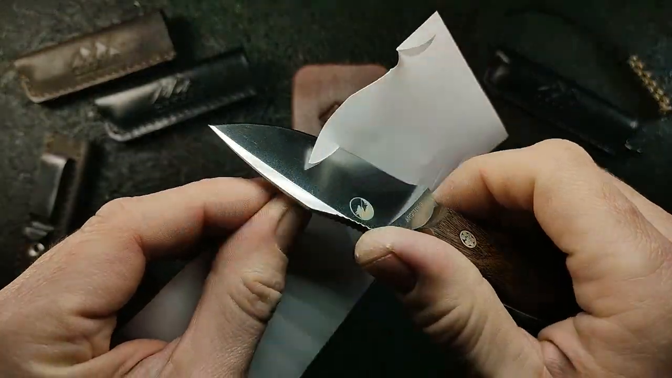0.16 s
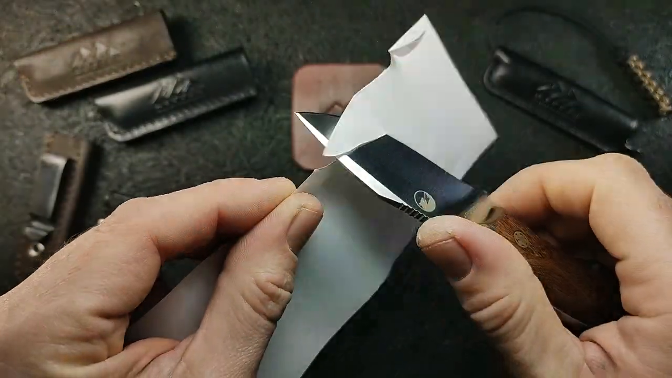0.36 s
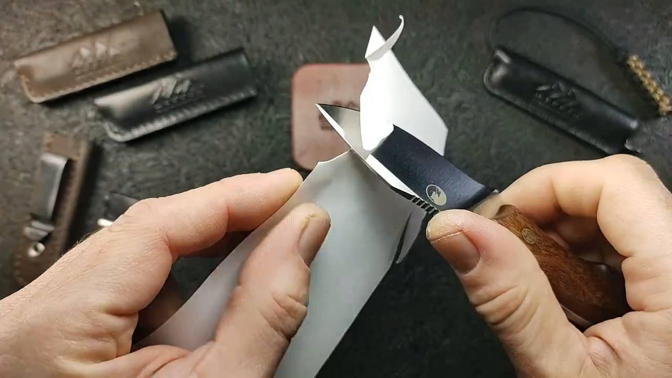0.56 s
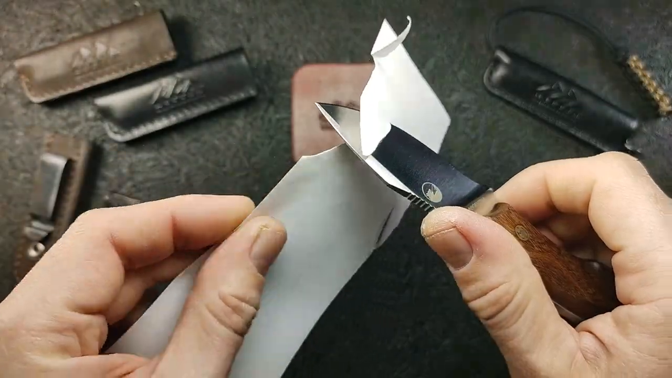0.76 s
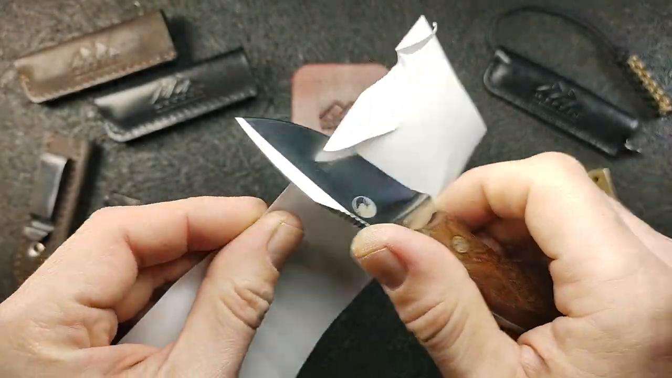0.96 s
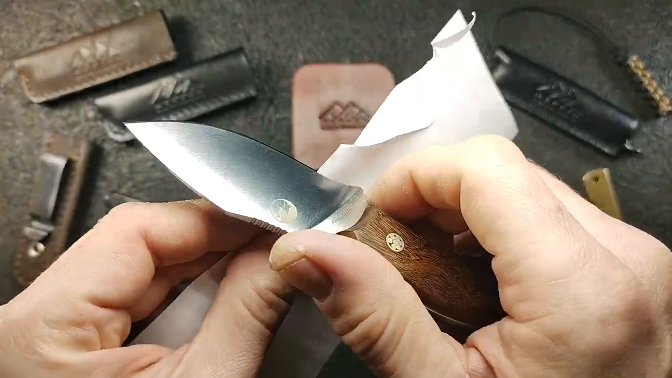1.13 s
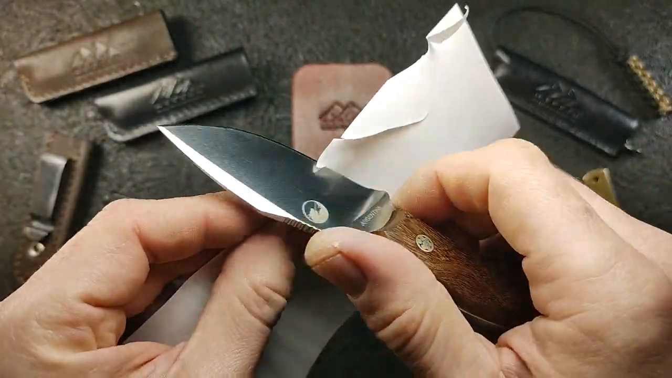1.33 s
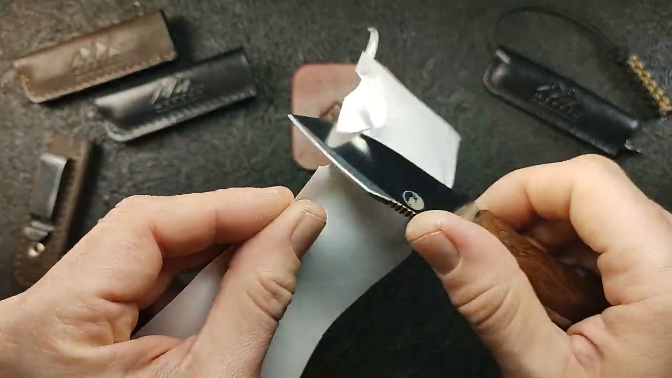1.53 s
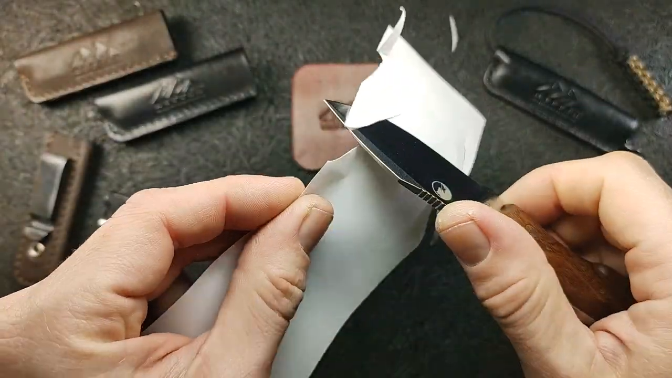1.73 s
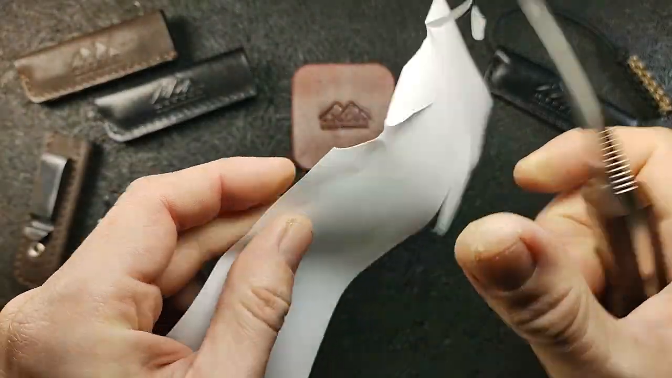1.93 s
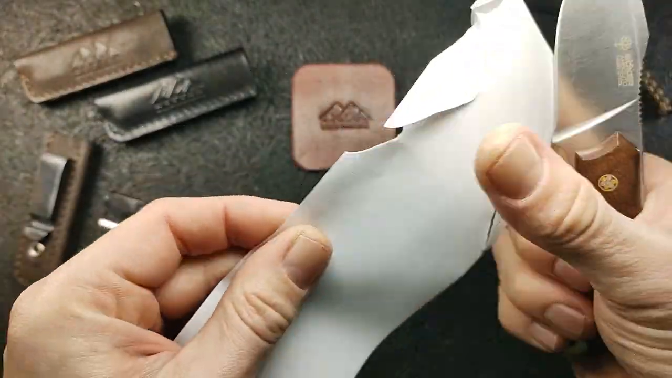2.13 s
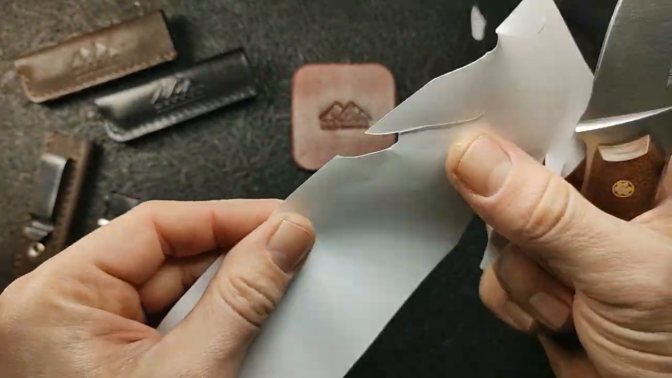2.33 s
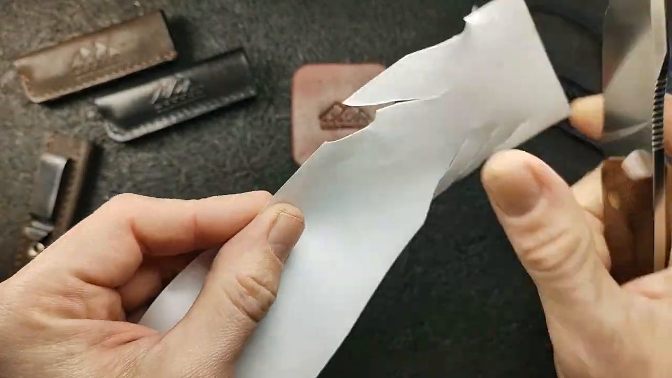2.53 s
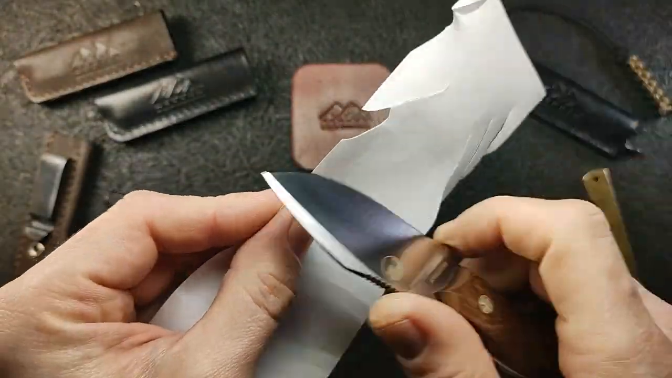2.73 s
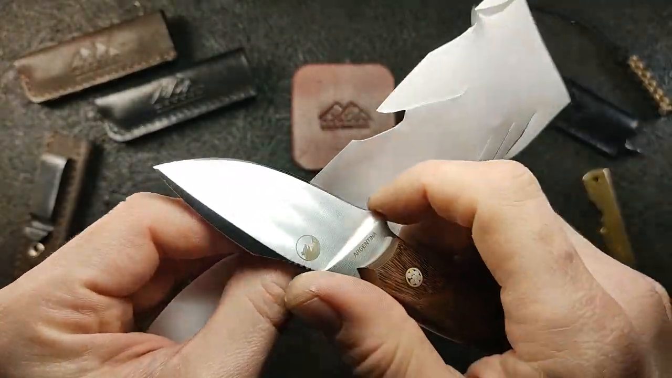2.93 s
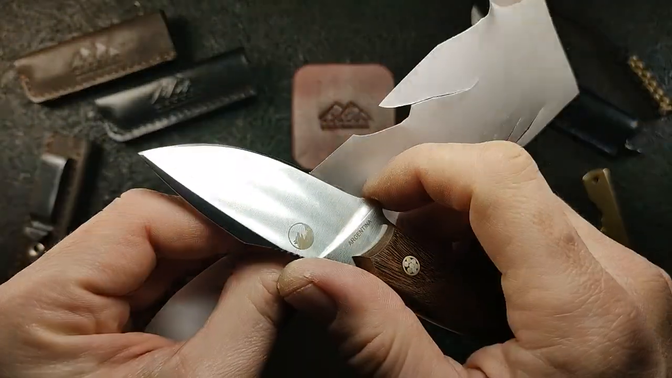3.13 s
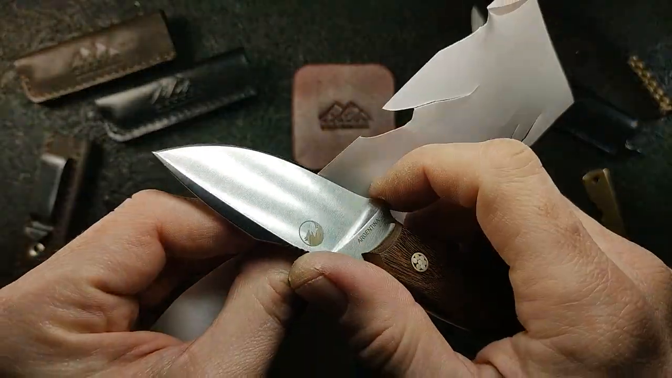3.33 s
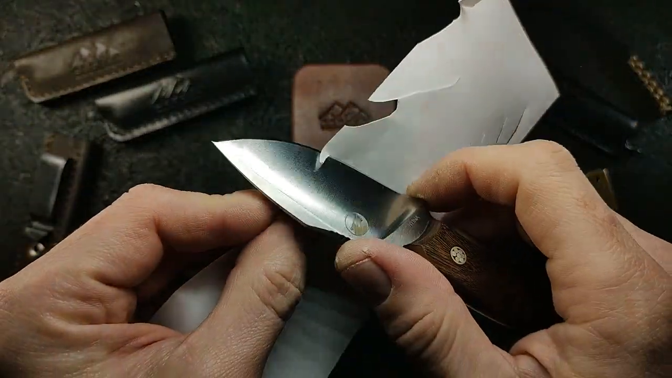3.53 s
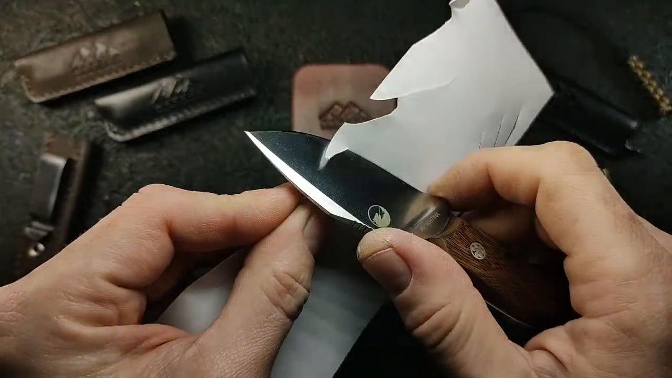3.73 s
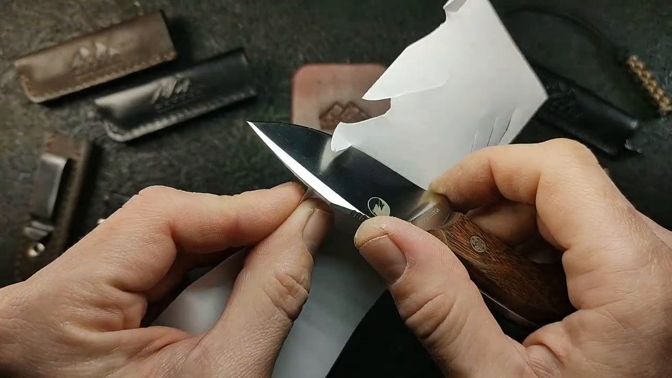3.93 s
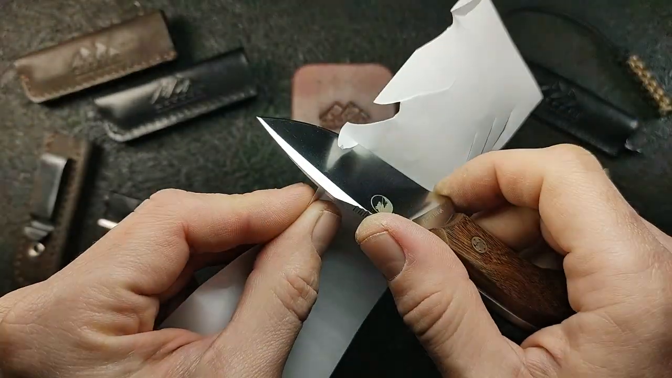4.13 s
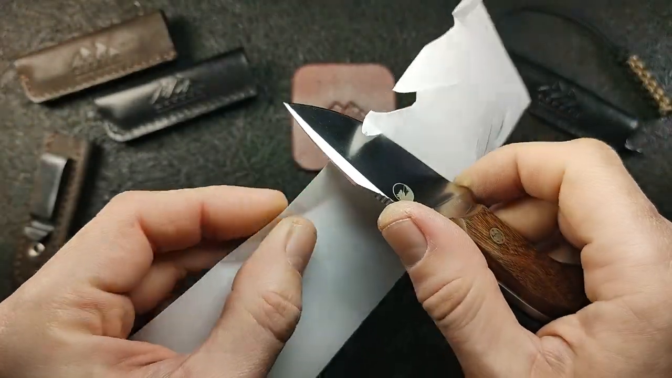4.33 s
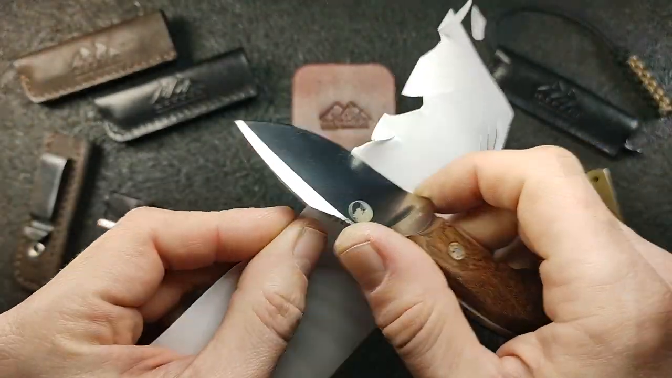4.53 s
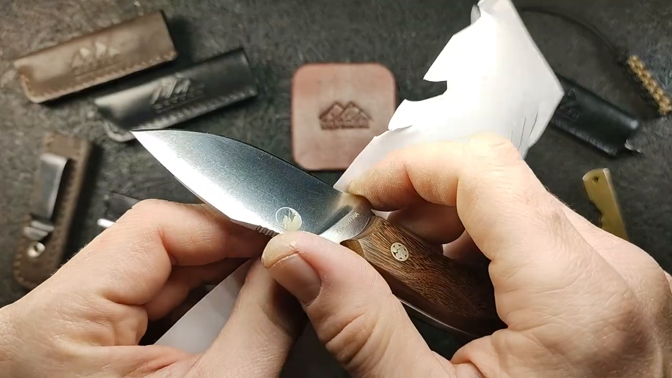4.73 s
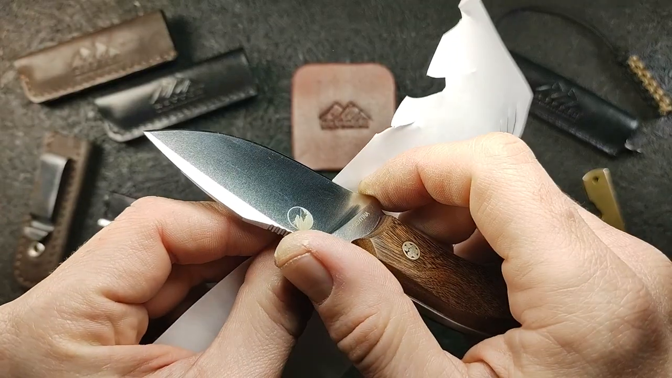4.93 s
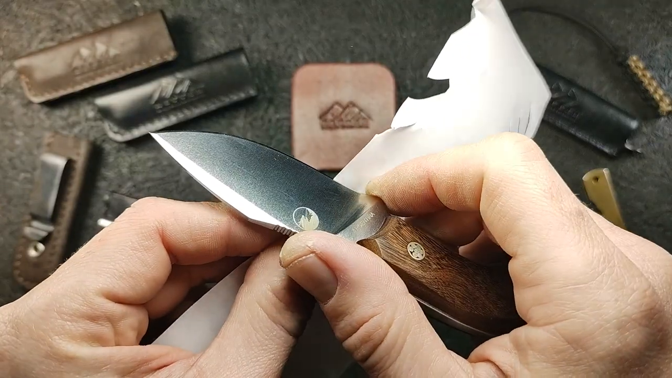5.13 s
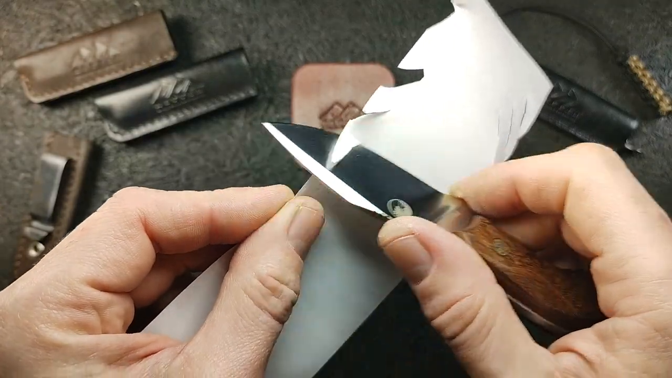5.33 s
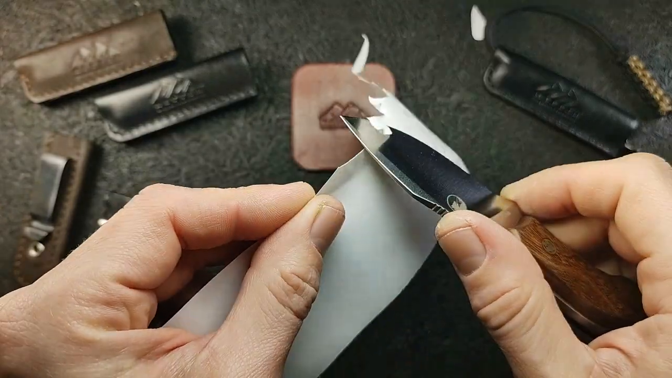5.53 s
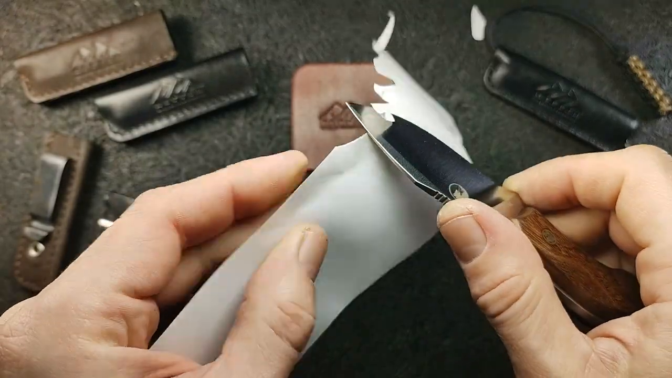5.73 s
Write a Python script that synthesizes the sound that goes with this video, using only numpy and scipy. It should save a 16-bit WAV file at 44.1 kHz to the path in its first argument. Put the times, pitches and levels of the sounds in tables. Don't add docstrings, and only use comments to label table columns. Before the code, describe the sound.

A sharp blade slices a hand-held sheet of paper in several quick crisp rips, with papery rustles and small pops between, in a quiet room.

```python
import sys
import numpy as np
from scipy import signal
from scipy.fft import rfft, irfft, next_fast_len
from scipy.io import wavfile
from scipy.ndimage import uniform_filter1d, map_coordinates

SR = 44100
rng = np.random.default_rng(int(sys.argv[2]) if len(sys.argv) > 2 else 0)


def store_wav(level_fs):
    pcm = np.round(np.clip(np.atleast_2d(level_fs), -1, 1) * 32767)
    wavfile.write(sys.argv[1], SR, pcm.T.astype(np.int16))


def gain_from_db(level_db):
    decades = np.asarray(level_db, float) / 20
    return 10 ** decades


N = 254898

# frequency in Hz, density in dB per Hz.
RUMBLE_SPECTRUM = [(15, -40), (30, -46), (45, -8), (62, -6.5), (75, -5.5), (87, 0.5), (100, -10),
                   (125, -15), (200, -26), (300, -45), (450, -62)]
# time in seconds, rumble level in dB.
MACHINE_LOAD = [(0.0, -72), (0.27, -68), (0.45, -61.5), (1.29, -69.5), (3.81, -66), (4.01, -67.5),
                (5.49, -62), (5.78, -65.5)]
# peak in seconds, level in dB, rise and fall in seconds for 20 dB.
LINE_SWELLS = [
    (.38, -66.5, 0.14, 0.21),
    (.66, -70, 0.11, 0.37),
    (1.11, -76, 0.33, 0.22),
    (1.69, -57.5, 0.27, 0.21),
    (2.05, -68, 0.23, 0.43),
    (2.46, -61, 0.063, 0.14),
    (3.64, -68, 0.14, 0.3646),
    (4.06, -81, 0.73, 0.1514),
    (5.131, -70.5, 0.57, 0.2656),
    (5.599, -66.5, 0.2802, 0.15),
]
# frequency in Hz, density in dB per Hz.
HISS_SPECTRUM = [(150, 8.5), (300, 1), (600, 0), (1200, -7.5), (2500, -6.5), (5000, -15.5), (9000, -17.5),
                 (16000, -22)]
# centre in Hz, width in Hz, gain in dB.
DESK_MODES = [(462, 76, 10.5), (858, 200, 7.5), (1000, 75, -10), (1360, 180, 4.5), (1575, 140, -9),
              (1695, 200, 7), (1983, 43, -16), (2600, 410, 4.5), (3150, 930, -7), (4100, 4100, 18.5),
              (4414.2, 100, -11.5), (5240, 250, 1), (6900, 2800, 10), (9250, 2300, -4)]
# delay in ms, share of the direct sound as a signed ratio.
QUICK_ECHOES = [(0.382, 0.41), (0.515, 0.2), (.76, 0.93), (0.963, -0.41), (1.301, 0.057), (1.585, 0.45),
                (2.019, -0.53), (2.8, 0.045)]
# time in seconds, peak in dB, bright edge in dB re peak.
PAPER_TICKS = [(0.093, -67, 12.5), (.117, -72, 17), (.479, -43, 17), (1.457, -49, 1), (2.421, -34.5, 0),
               (2.475, -35, -7.5), (2.494, -24, -11), (3.229, -52, -12), (4.41, -57, 12), (4.45, -43.5, 5),
               (4.583, -51, 5), (1.991, -51.5, 13.5), (2.25, -48, 10.5), (0.214, -52.5, 9),
               (0.151, -56, 7.5), (0.203, -50, 4), (.7, -54, 7), (2.122, -54, 16.5), (2.363, -45.5, 13),
               (2.411, -38, 1.5), (2.621, -38.5, 2), (2.742, -42, 6.5), (2.769, -50, 12), (2.795, -62, 17),
               (2.828, -48, 3.5), (3.047, -45, 2), (2.33, -39, 6), (2.681, -30.5, -6), (2.703, -38.5, 8),
               (3.258, -52.5, 9), (3.335, -48.5, -18), (4.091, -43, 4.5), (4.267, -50, 4), (4.273, -43, 7),
               (4.285, -33.5, 4), (4.293, -44.5, 10.5), (4.12, -37, -5), (4.128, -34, -6),
               (4.11, -40.5, -0.5), (4.138, -34, -1.5), (4.184, -47.5, 10), (4.685, -34.5, -1),
               (4.763, -44, 3)]
# time in seconds, peak in dB, bright edge in dB re peak,
# thump in dB re peak, thump frequency in Hz.
BUCKLE_POPS = [(0.7344, -38, -34, -2.5, 553), (0.773, -33.5, -29, -2.5, 470), (1.067, -53.5, -4, 2.5, 465),
               (0.601, -40, -17, 0, 500), (1.702, -29.5, -11, 3, 650), (1.722, -35.5, 2, -0.5, 430),
               (1.749, -35.5, 10.5, -1, 750), (2.432, -59, -18, 2, 260), (2.451, -53, -15, -7, 443),
               (2.014, -46.5, -28, -17, 300), (2.022, -36.5, -28, -15, 430), (1.596, -30, -25.5, -10, 700),
               (2.318, -40.5, -20, -31, 450), (2.336, -33, -7, -13.5, 430), (2.447, -39, -13.5, -2, 500),
               (2.466, -49, 14, 6, 597.6), (2.456, -23.5, -19, -30, 581), (2.486, -18, -23, -23, 163),
               (2.676, -31, -5, -6.5, 375), (4.16, -26, -25, -26, 497), (4.628, -61, -14, 6.5, 362),
               (4.697, -36, -9, -14.5, 470.2)]
# start in seconds, length in seconds, start and end level in dB, tautness 0-1.
FINGER_SLIDES = [(0.106, 0.099, -75, -74, 0.6), (0.755, 0.08, -77, -60, 0.96),
                 (0.874, 0.053, -70, -64.5, 0.65), (0.944, 0.067, -59, -62, 0.68),
                 (1.02, 0.13, -66, -70.5, 0.52), (1.179, 0.03, -53, -54, 0.54),
                 (1.261, 0.12, -67, -66.5, 0.2), (1.765, 0.3, -59.5, -99, 0.68),
                 (1.985, 0.12, -66, -59.5, 0.72), (2.135, 0.096, -65, -72, 0.5),
                 (2.214, 0.12, -64, -62, 0.92), (2.411, 0.088, -83, -48, 0.96),
                 (2.522, 0.073, -69, -68.5, 0.37), (2.631, 0.02402, -63.5, -64, 0.5),
                 (2.737, 0.16, -59.5, -92, 0.43), (3.075, 0.14, -74, -67, 0.2),
                 (3.264, 0.089, -66.5, -76.5, 0.1), (3.415, 0.026, -72.5, -73.5, 0.03),
                 (3.533, 0.015, -82, -70, 0.46), (3.941, 0.076, -73, -76, 0.44),
                 (4.395, 0.21, -60.5, -59.5, 0.76), (4.778, 0.061, -63.5, -61.5, 0.7),
                 (4.871, 0.036, -61, -73.5, 0.64), (4.933, 0.13, -75, -67.5, 0.38)]
# peak in seconds, level in dB, rise and fall in seconds for 20 dB, tautness 0-1.
SHEET_TUGS = [(0.813, -61, 0.24, 0.24, 0.64), (1.172, -61.5, 0.069, 0.026, 0.29),
              (1.25, -46, 0.039, 0.1, 0.91), (2.13, -51.5, 0.013, 0.016, 1),
              (2.341, -56, 0.057, 0.14, 0.79), (2.487, -43.5, 0.0034, 0.037, 0.27),
              (2.679, -33.5, 0.014, 0.01, 0.4548), (2.923, -59, 0.052, 0.049, 0.83),
              (4.184, -56, 0.0054, 0.036, 0.66), (4.288, -59, .045, .03, .8),
              (4.699, -56, 0.014, 0.02, 0.18), (4.77, -57.5, 0.071, 0.022, 0.52),
              (1.98, -61.5, 0.033, 0.15, 0.86), (3.064, -58, 0.024, 0.081, 0.91),
              (2.452, -50, 0.0046, 0.083, 0.7), (2.658, -42.5, 0.0058, 0.056, 1),
              (2.702, -47, 0.054, 0.024, .4), (4.64, -70, 0.047, 0.1, 0.56),
              (5.02, -65, 0.092, 0.063, 0.74), (5.72, -71.5, 0.064, 0.26, 0.58)]
# time in seconds, force in dB, slack of the flap 0-1, tautness of the edge 0-1.
EARLY_CUTS = [
    [(.204, -60, 0.42, 0.56), (.324, -44.5, 0.27, 0.69), (.372, -45, 0.34, 1), (.434, -43, 0.46, 1),
     (.45, -50, 0.5, 0.8), (.474, -60, 0.55, 1)],
    [(.478, -38.5, 0.12, 1), (.532, -36, 0.17, 0.45), (.57, -32.5, 0.09, 0.4), (.605, -32, 0.25, 0.34),
     (.635, -38.5, 0.65, 0.54), (.68, -52, 0.81, 0.56), (.69, -64, 0.54, 0.04), (.72, -72.5, 0.5, 0)],
    [(1.44, -83.5, 1, 0.8), (1.466, -63, 0.42, 0.55), (1.57, -45, 0.52, 1), (1.648, -33, 0.18, 0.62),
     (1.674, -32.5, 0.19, 0.86), (1.69, -47, 0.8, 0.13)],
    [(1.7, -41.5, 0.48, 0.6), (1.714, -37, 0.5, 0.8), (1.754, -44.5, 0.45, 1), (1.78, -79.5, 0.1, 0.4)],
]
# time in seconds, force in dB, slack of the flap 0-1, tautness of the edge 0-1.
LATE_CUTS = [
    [(3.53, -76, 0.06, 0.1), (3.575, -66.5, 0.01, 0.16), (3.61, -46, 0.36, 0.4), (3.65, -43.5, 0.27, 0.34),
     (3.725, -44, 0.45, 0.47), (3.762, -49.5, 0.63, 0.66), (3.775, -51.5, 0.6, 0), (3.79, -53, 0.73, 0.46)],
    [(3.8, -44.5, 0.6, 0.6), (3.82, -47.5, 0.68, 0.53), (3.85, -47, 0.62, 0.76), (3.874, -47, 0.68, 0.86),
     (3.908, -45.5, 0.56, 0.88), (3.926, -106, 1, 0.2)],
    [(4.09, -67, 0.33, 0.54), (4.104, -62, 0.77, 0.52), (4.11, -43, 0.44, 0.8), (4.115, -49, .4, .8),
     (4.12, -42.5, 0.35, 0.78), (4.132, -48.5, .45, 0.7), (4.141, -44, 0.46, 0.93), (4.15, -52, 0.57, 0.66),
     (4.17, -77.5, 0.9, 0.7)],
    [(5.29, -77.5, 0.4, 0.31), (5.37, -65.5, 0.69, 0.83), (5.44, -46, 0.45, 0.64), (5.478, -38, 0.21, 0.69),
     (5.525, -36.5, 0.19, 0.76), (5.54, -41, 0.38, 0.9), (5.57, -31.5, 0, 0.8), (5.59, -36, 0, 0.63),
     (5.618, -36.5, 0.22, 0.5), (5.648, -42, 0.58, 0.73), (5.692, -66, 0.57, 0.4)],
]
# frequency in Hz, density in dB per Hz.
PAPER_SPECTRUM = [(120, 0.5), (300, -31.5), (900, -9.5), (1500, -6), (3000, 4), (5500, -7), (8500, -4.5),
                  (13000, -3.5), (15800, -3)]
# time in seconds, left-right balance in dB.
SHEET_PLACE = [(0.0, 19.5), (0.24, 3.5), (0.45, -0.5), (1.32, 5), (1.93, -1), (3.2, 5), (3.43, 3.5),
               (5.26, 3), (5.36, 2.5), (5.78, 0)]
BAND_EDGES_HZ = [5400, 9000, 3250, 5400, 250, 600, 600, 980, 980, 1530, 1530, 2030, 2030, 3150, 9000, 16000]
BENDING_OCTAVES = [.35, .8, 1.35]
# time in seconds, favoured pitch in octaves over 1 kHz, upper flap mode in dB re lower.
SHEET_BOW = [
    [(0, 1.3, -6), (.2, 0.61, -10), (.36, 1.425, -2.5), (.46, 1.8, -2), (.54, 0.81, -12), (.6, 1.7, -7),
     (.68, 0.64, -2), (.9, 2.45, -2.5), (1.25, 1.554, -2.5)],
    [(1.45, 0.53, -3), (1.55, 1.6, -2), (1.62, 1.5, 7), (1.68, 1, -5.5), (1.77, 1.5, 3.5), (2, 2, 0.5),
     (2.3, 1.6, -5), (2.5, 2.8, -3), (2.7, 2.2, -1)],
    [(2.95, 2.9, 1), (3.1, 1.7, -15), (3.45, 1.1, -16), (3.62, 1.65, -10), (3.75, 0.87, -11.5),
     (3.9, 2.3, -8), (4.1, 0.544, -0.5), (4.3, 4.3, -4)],
    [(4.5, 2.4, 0), (4.8, 2.1, -0.5), (5.05, 1.5, -2), (5.3, 2.2, 3), (5.45, 1.4, -9.5), (5.55, 3.75, -3),
     (5.6, 2.7, 0), (5.66, 2.5, 1.5), (5.78, 1.817, 0)],
]
# middle in seconds, level in dB re force, length in seconds, pitch in Hz.
MODE_SINGS = [(0.152, 0, .12, 4100), (0.231, -2, .05, 4100), (3.158, -2, 0.08, 1407),
              (3.169, 4, 0.091, 1894), (5.385, 3, 0.059, 4200), (5.524, -5, .04, 5180),
              (5.58, -7, 0.033, 5150), (0.377, -2, .12, 2657), (0.363, -13, .12, 1733),
              (.4, -6, 0.093, 5160), (0.561, -6, 0.076, 6900), (0.591, -4.5, .07, 4680),
              (0.613, -13, 0.0204, 1740), (1.476, -2.5, 0.038, 1410), (1.564, -2.5, 0.089, 1750),
              (1.665, -2, 0.036, 2620), (1.65, -11, 0.07, 5130), (2.458, 11, 0.013, 1670),
              (2.49, 9, 0.014, 1652), (3.062, 0, .03, 2394), (3.276, -1, .04, 2470),
              (3.262, 5, 0.031, 4100), (3.333, 2, 0.036, 2370), (3.345, 9, .04, 4100),
              (3.431, 0, .06, 1760), (3.425, 3, .05, 4100), (3.625, -7, .1, 4140), (3.687, -6.5, .16, 1723),
              (3.718, -2.5, .1, 5289), (3.872, -1.5, 0.14, 1320), (3.87, -7, .1, 2663),
              (4.12, -5, 0.062, 5299), (4.137, 4, .04, 2616), (4.12, -2.5, 0.048, 1685),
              (5.49, -4.5, .1, 3910), (5.514, -5.5, 0.07, 1723), (5.563, -4, .03, 4230),
              (5.569, -4, .035, 3730), (5.619, -1.5, 0.057, 5490), (5.635, -2, 0.036, 2625),
              (5.635, -4.5, 0.062, 1320)]
# centre in Hz, width in Hz, gain in dB.
RIM_MODES = [(1406, 71, 6.5), (1956, 53, 6), (2190, 83, 6), (2453, 230, 12.5), (2520, 170, 5),
             (3780, 149, -23), (5040, 83, -9)]
# peak in seconds, level in dB, rise and fall in seconds for 20 dB.
RIM_CATCHES = [(.38, -37.5, 0.066, 0.073), (3.051, -44.5, 0.0094, .008), (3.059, -39.5, 0.0069, 0.0063),
               (3.071, -43, 0.01, 0.018), (3.15, -61, 0.18, 0.11), (3.21, -55, 0.14, 0.02),
               (3.262, -51.5, 0.01285, 0.017), (3.278, -58, .012, 0.01074), (3.34, -57, 0.024, 0.022),
               (3.434, -72, 0.027, 0.034), (3.71, -40.5, 0.05, 0.087), (3.86, -48, 0.35, 0.031),
               (4.13, -46, 0.038, 0.028)]
# frequency in Hz, reverberation time (60 dB) in seconds.
ROOM_DECAY = [(200, 0.64), (2000, 0.12), (12000, 0.062)]
# frequency in Hz, side level in dB.
STEREO_WIDTH = [(150, 2.5), (350, 2.5), (800, 1.5), (1600, -1), (2800, -1), (5000, 0), (10000, 0.5),
                (15000, 0)]


def unit(x):
    return x / np.sqrt(np.mean(x ** 2) + 1e-20)


def along(points, hz):
    f, v = np.transpose(points)
    return np.interp(np.log(hz + 1), np.log(f + 1), v)


def curves(rows):
    s, *cols = np.transpose(rows)
    return [np.interp(np.arange(N) / SR, s, c) for c in cols]


def wobble(rate, at=None):
    steps = np.arange(0, N + 16, 16) if at is None else at
    knots = rng.standard_normal(int(N * 400 / SR) + 4)
    read = map_coordinates(knots, [steps * min(rate, 399) / SR])
    return np.interp(np.arange(N), steps, read) if at is None else read


def filtered(x, response):
    m = next_fast_len(N + 8192)
    return irfft(rfft(x, m) * response(np.fft.rfftfreq(m, 1 / SR)), m)[..., :N]


def band(lo_hz, hi_hz):
    def warped(hz):
        return np.tan(np.pi * np.clip(hz, 1e-3, SR / 2 - 1) / SR)

    def response(f):
        w, lo, hi = warped(f), warped(lo_hz), warped(hi_hz)
        s = (lo * hi - w * w) / (1j * w * (hi - lo))
        first = s * s + 2 * np.sin(np.pi / 8) * s + 1
        second = s * s + 2 * np.cos(np.pi / 8) * s + 1
        return 1 / (first * second)
    return response


def peak(s, db, rise_s, fall_s):
    return [(s - 3 * rise_s, db - 60), (s, db), (s + 3 * fall_s, db - 60)]


def blend(shapes):
    step_s = 0.001
    t = np.arange(0, N / SR + step_s, step_s)
    read = np.array([[np.interp(t, s, c) for c in cols] for s, *cols in map(np.transpose, shapes)])
    power = gain_from_db(2 * read[:, :1])
    mixed = (power * read).sum(0) / power.sum(0)
    return curves(np.column_stack([t, 10 * np.log10(power.sum(0)[0]), *mixed[1:]]))


def swells(rows):
    return blend([peak(*row) for row in rows])[0]


def hum(force_db):
    shake = np.clip((force_db + 62.5) / 25, 0, 1)
    rumble_db = curves(MACHINE_LOAD)[0] + 4.5 * uniform_filter1d(shake, size=round(0.04 * SR))
    common, apart = filtered(rng.standard_normal((2, N)), lambda f: gain_from_db(along(RUMBLE_SPECTRUM, f)))
    line_hz = 157 + 4 * wobble(4.5)
    line = gain_from_db(swells(LINE_SWELLS) + 2.1 * wobble(3.4)) * np.sin(2 * np.pi * np.cumsum(line_hz) / SR)
    mid = unit(common) * gain_from_db(rumble_db + 1.07 * wobble(1.54)) + line
    side = gain_from_db(rumble_db - 19.0) * unit(apart) + 0.081 * mid
    return np.array([mid + side, mid - side])


def hiss():
    mid, side = unit(filtered(rng.standard_normal((2, N)), lambda f: gain_from_db(along(HISS_SPECTRUM, f))))
    side = filtered(side, lambda f: f / (f + 900))
    return gain_from_db(-71.0) * np.array([mid + side, mid - side])


def resonant(f, depth):
    total = 1
    for c, w, db in DESK_MODES:
        gain = gain_from_db(depth * db / 2)
        total = total * (c * c - f * f + 1j * f * w * gain) / (c * c - f * f + 1j * f * w / gain)
    return total


def nearby(x, modes_db, strength, drift_ms, lead_ms, skew_ms):
    size = 2048
    hz, t, z = signal.stft(x, SR, nperseg=size)
    at = np.minimum((t * SR).astype(int), N - 1)
    late = [ms * (1 + drift_ms * wobble(2.5, at)) for ms, share in QUICK_ECHOES]
    skew = [lead_ms + skew_ms * wobble(3, at) for echo in QUICK_ECHOES]
    fine = rng.standard_normal((3, *z.shape), dtype=np.float32)
    fine = uniform_filter1d(uniform_filter1d(fine, size=3, axis=1), size=7, axis=2)
    shared, *own_modes = modes_db * unit(fine)
    lead = np.float32(lead_ms * (1 + 0.23 * wobble(1.483, at)))
    turn = np.complex64(-2j * np.pi * hz[:, None] / 1000)
    ears = []
    for side, own in zip((-0.5, 0.5), own_modes):
        paths = 0
        for (_, share), ms, gap in zip(QUICK_ECHOES, late, skew):
            paths = paths + share * np.exp(turn * np.float32(ms + side * gap))
        arrival = np.exp(turn * side * lead) + strength * paths
        heard = z * gain_from_db(shared + 1.03 * own) * arrival
        ears.append(signal.istft(heard, SR, nperseg=size)[1][:N])
    return np.array(ears)


def snaps():
    t = np.arange(SR // 10) / SR
    thump, knock, dull, edge = np.zeros((4, N + len(t)))
    ticks = [(*row, -32.5, 152.3, 0.01) for row in PAPER_TICKS]
    pops = [(*row, 0.023) for row in BUCKLE_POPS]
    for s, db, edge_db, thump_db, hz, t60 in ticks + pops:
        rise_s = np.clip(0.001 * gain_from_db(-0.8 * edge_db - max(db + 26, 0)), 2e-4, 0.0012)
        rise = 1 - np.exp(-t / rise_s)
        rattle = rng.standard_normal(len(t)) + 3 * np.exp(-t / 0.00022)
        burst = gain_from_db(db - 60 * t / t60) * rise * rattle
        at = slice(round(s * SR), round(s * SR) + len(t))
        thump_t60 = 0.24 * t60 + (30 / hz) ** 2
        thump[at] += gain_from_db(thump_db + db + 6.5 - 60 * t / thump_t60) * rise * np.sin(2 * np.pi * hz * t)
        click = dull if edge_db < -20 else knock
        click[at] += burst
        edge[at] += gain_from_db(edge_db - 12.0) * burst
    pop = thump[:N] + filtered(edge[:N], band(2900, 16000))
    pop += 1.42 * filtered(knock[:N], lambda f: (1j * f / (420 + 1j * f)) ** 2 / (1 + 1j * f / 2600) ** 3)
    pop += 1.77 * filtered(dull[:N], lambda f: (1j * f / (350 + 1j * f)) ** 2 / (1 + 1j * f / 3300) ** 5)
    pop = filtered(pop, lambda f: resonant(f, depth=0.89))
    ears = nearby(pop, modes_db=1.02, strength=0.41, drift_ms=0.088, lead_ms=0.12, skew_ms=0.17)
    return ears * gain_from_db([[1.2], [-1.2]])


def closed(rows, rise_s, fall_s):
    first = peak(*rows[0][:2], rise_s, fall_s)[0]
    last = peak(*rows[-1][:2], rise_s, fall_s)[-1]
    return [(*first, *rows[0][2:]), *rows, (*last, *rows[-1][2:])]


def hands():
    def held(taut):
        return 0.72 - 0.47 * taut, taut

    gestures = [closed(rows, rise_s=0.0028, fall_s=0.0084) for rows in EARLY_CUTS + LATE_CUTS]
    for s, length, start_db, end_db, taut in FINGER_SLIDES:
        rows = [(s, start_db, *held(taut)), (s + length, end_db, *held(taut))]
        gestures.append(closed(rows, rise_s=0.029, fall_s=0.035))
    for *shape, taut in SHEET_TUGS:
        gestures.append([(*corner, *held(taut)) for corner in peak(*shape)])
    return blend(gestures)


def fibres(per_s, spread_db, rub_db):
    breaks = rng.random(N) < per_s / SR * gain_from_db(2.5 * wobble(150))
    sizes = rng.standard_normal(N) * gain_from_db(spread_db * rng.standard_normal(N))
    return unit(breaks * sizes) + gain_from_db(rub_db) * rng.standard_normal(N)


def sheet(tear_db, slack, taut):
    cutting = np.clip((tear_db + 57.0) / 14, 0, 1)
    torn = fibres(per_s=5500, spread_db=3.5, rub_db=3.0 - 5.8 * cutting)
    sources = np.vstack([torn, rng.standard_normal((2, N))])
    shaken = filtered(sources, lambda f: gain_from_db(along(PAPER_SPECTRUM, f)) * resonant(f, depth=1.0))
    near = nearby(shaken[0], modes_db=2.5, strength=1.0, drift_ms=0.0814, lead_ms=0.14, skew_ms=0.093)
    near = near / np.sqrt(np.abs(uniform_filter1d(near[0] ** 2, size=2000)) + 1e-20)
    far_edges = filtered(shaken[1:], lambda f: f ** 2 / (f ** 2 + 1800 ** 2))
    heard = near + gain_from_db(3.0 - 11.6 * cutting) * unit(far_edges)

    pitch, upper_db = curves(sum(SHEET_BOW, []))
    favour = gain_from_db(-2.5 * (np.c_[BENDING_OCTAVES] - pitch) ** 2)
    body_db = -12.5 + 16.5 * slack
    modes_db = body_db + 20 * np.log10(favour / np.sqrt((favour ** 2).sum(0)))
    flap_db = -24.5 + 33.5 * slack ** 1.21
    bright_db = -3 - 7 * (1 - cutting) * (1 - taut)
    main_db = -7.5 + 2.5 * slack + 2.5 * (pitch - 1)
    sizzle_db = -20 + 22 * taut
    shares_db = (bright_db, main_db, flap_db - 6.0, flap_db + upper_db, *modes_db, sizzle_db)
    total = 0
    for (lo_hz, hi_hz), share_db in zip(np.reshape(BAND_EDGES_HZ, (-1, 2)), shares_db):
        part = filtered(heard, band(lo_hz, hi_hz))
        power = np.abs(uniform_filter1d(part.mean(0) ** 2, size=2000))
        total = total + part / np.sqrt(power + 1e-20) * gain_from_db(tear_db + share_db)

    judder = gain_from_db(0.45 * wobble(35) + 0.8 * wobble(90))
    judder = judder * gain_from_db((1 - cutting) * (1.6 * wobble(22) + 1.3 * wobble(70)))
    pan_db = curves(SHEET_PLACE)[0]
    return total * judder * gain_from_db([pan_db / 2, -pan_db / 2])


def off_centre(x):
    return np.array([gain_from_db(2) * x, np.roll(x, shift=7)])


def singing(force_db):
    half = SR // 8
    out = np.zeros(N + SR)
    t = np.arange(-half, half) / SR
    narrow = signal.butter(1, 130 / 2, fs=SR, output="sos")
    for s, db, length_s, hz in MODE_SINGS:
        drive = signal.sosfilt(narrow, rng.standard_normal((2, len(t))))
        ring = drive[0] * np.cos(2 * np.pi * hz * t) + drive[1] * np.sin(2 * np.pi * hz * t)
        swell = np.cos(np.pi / 2 * np.clip(t / min(length_s, 0.12), -1, 1)) ** 2
        level = np.sqrt(np.average(ring ** 2, weights=swell))
        out[round(s * SR):][:len(t)] += gain_from_db(db) * swell * ring / level
    return off_centre(out[half:][:N] * gain_from_db(force_db))


def rasp():
    def rim(f):
        modes = sum(gain_from_db(db) * 1j * f * w / (c * c - f * f + 1j * f * w) for c, w, db in RIM_MODES)
        return modes * f ** 2 / (f + 900j) ** 2

    catches = fibres(per_s=1500, spread_db=3, rub_db=0)
    return off_centre(unit(filtered(catches, rim)) * gain_from_db(swells(RIM_CATCHES)))


def room(x):
    hz, t, z = signal.stft(rng.standard_normal((2, SR // 2)), SR, nperseg=256)
    decay = gain_from_db(-60 * t / along(ROOM_DECAY, hz)[:, None])
    tail = signal.istft(z * decay, SR, nperseg=256)[1]
    delayed = np.pad(x, (300, 0))[None]
    return signal.fftconvolve(delayed, tail / np.linalg.norm(tail[0]), axes=1)[:, :N]


def scene():
    force_db, slack, taut = hands()
    paper = snaps() + sheet(force_db, slack, taut) + singing(force_db) + rasp()
    return paper + gain_from_db(-23.5) * room(paper.mean(0)) + hum(force_db) + hiss()


def band_limit(x):
    return signal.sosfilt(signal.butter(12, 15900, fs=SR, output="sos"), x)


def record(dry):
    def kept(f):
        return (f < 15850) * (1j * f / (38 + 1j * f)) ** 2

    mid_side = np.array([dry[0] + dry[1], dry[0] - dry[1]]) / 2
    mid, side = filtered(mid_side, lambda f: kept(f) * gain_from_db([0 * f, along(STEREO_WIDTH, f)]))
    return band_limit(np.array([mid + side, mid - side]))


dry = scene()
out = record(dry)
store_wav(out)
```